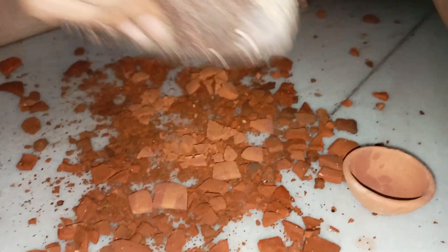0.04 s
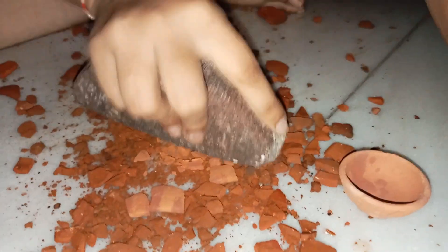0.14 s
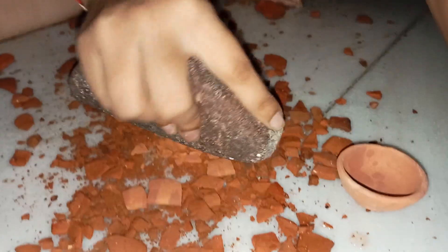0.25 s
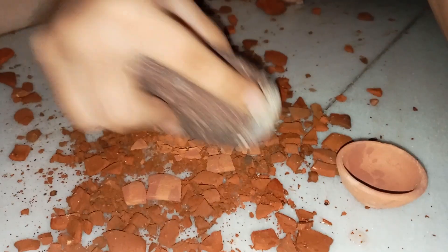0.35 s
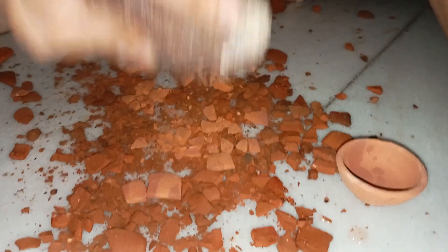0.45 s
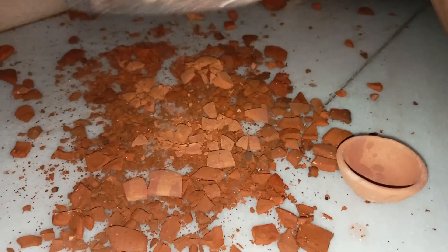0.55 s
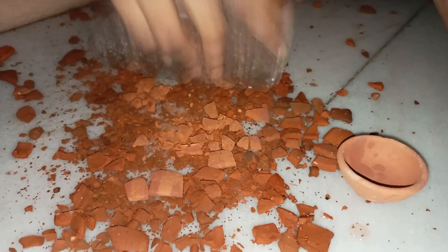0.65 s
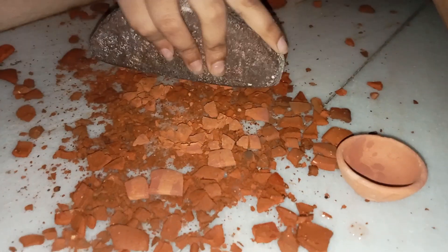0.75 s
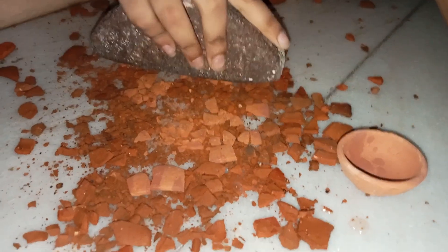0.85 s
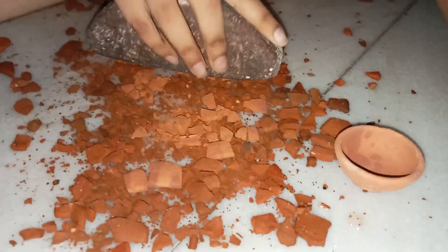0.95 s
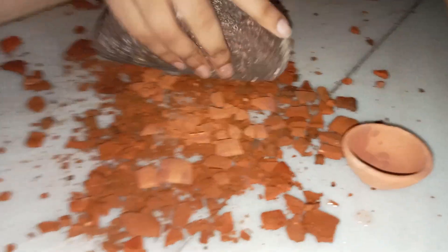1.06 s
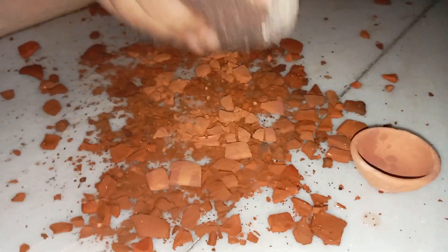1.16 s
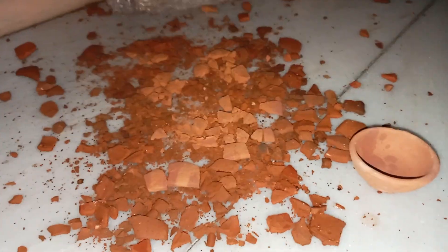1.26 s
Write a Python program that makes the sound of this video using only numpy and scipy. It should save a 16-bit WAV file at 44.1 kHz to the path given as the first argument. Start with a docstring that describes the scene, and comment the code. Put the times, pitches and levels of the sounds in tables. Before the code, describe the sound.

A rough stone strikes clay shards on a tiled floor twice, crunching hard in an echoing room

```python
"""A bare, echoing room with a tiled floor, where a rough stone comes down twice on clay shards. Each blow is a
crunch of random snaps ringing stone and shard modes, a thud of slab and tile, and dull knocks. Band-filtered
noise makes the tails, one left from an earlier blow, as well as the steady room hiss. Singing shards, an uneven
low pulsing and grit ticks fill the gaps; soft low knocks and a faint rustle come last. The small microphone
thins the deep bass and overloads on peaks."""
import sys
import numpy as np
from scipy import signal
from scipy.io import wavfile

SR = 44100
rng = np.random.default_rng(int(sys.argv[2]) if len(sys.argv) > 2 else 0)


def natural_amplitude(level_db):
    """Convert a level in decibels to a linear amplitude factor, elementwise."""
    exponent = np.asarray(level_db, float) / 20
    return 10 ** exponent


def output_pcm(signal):
    """Save a mono or channel-first signal as 16-bit PCM at the path in sys.argv[1].

    Samples are clipped to [-1, 1] before scaling.
    """
    pcm = np.clip(np.atleast_2d(signal).T, -1, 1) * 32767
    wavfile.write(sys.argv[1], SR, np.round(pcm).astype(np.int16))


N = 59535
LEAD = SR // 2  # samples of run-up, trimmed off at the end
TOTAL = N + LEAD

# Steady room hiss, relative spectrum: [pitch_hz, density_db]
HISS_SPECTRUM = [(30, -20), (55, -4), (110, 3.5), (200, 3), (450, -6.5), (1000, -9), (2000, -10.5),
                 (3500, -14.5), (4500, -22), (5600, -74), (7500, -56.5), (9500, -35.5), (11500, -58),
                 (16000, -47)]
HISS_DB, HISS_WAVER_DB, HISS_KNOT_SAMPLES = -47, 0.7, 2000

# Reverberant tails, the first from an earlier blow: [start_s, level_db, early_decay_share of the late decay]
ROOM_TAILS = [(-0.27, 3.5, 0.34), (0.236, 1.5, 0.55), (0.773, 3.5, 0.77)]
# Colour of each tail, one list per tail: [pitch_hz, density_db]
TAIL_SPECTRA = [
    [(50, -29), (108, 5.5), (170, -24.5), (430, -2.5), (800, -12), (1200, -27), (2600, -22.5), (4500, -48),
     (6500, -60), (16000, -78)],
    [(50, -31), (110, -15.5), (160, 3), (240, -2.5), (640, -2.5), (880, -9), (1150, -18), (1900, -29),
     (2650, -19.5), (3900, -30.5), (5300, -54), (7000, -70), (9700, -39.5), (10600, -48), (12300, -46),
     (14000, -49), (16000, -58)],
    [(50, -16), (105, -26), (160, -15), (250, -25), (390, -5.5), (600, -24), (780, -18), (1240, -23),
     (2600, -28.5), (4000, -29), (5300, -38), (6500, -59), (7400, -47), (8400, -43), (10200, -28.5),
     (11800, -44), (13000, -57), (16000, -46)],
]
# Late decay of the room: [pitch_hz, t60_s]
ROOM_DECAY = [(60, 0.24), (150, 0.51), (500, 0.45), (1500, 0.43), (4000, 0.4), (10000, 0.16), (15000, 0.17)]
ROOM_RISE_S, EARLY_DECAY_S = 0.0013, 0.23
TAIL_FLICKER_DB, TAIL_FLICKER_KNOTS, TAIL_FLICKER_FROM_HZ = 2.0, 400, 1500  # knots per tail

# Grit ticking: [start_s, level_db]
GRIT_TICKS = [(0.0735, -57), (0.0945, -70), (0.103, -62), (0.1200, -53), (0.4150, -59), (0.438, -66),
              (1.0866, -60)]
TICK_DECAY_S, TICK_LOW_HZ = 0.0005, 4000

# Clay cracking under the stone, one list per blow: [start_s, level_db, length_s]
CLAY_CRACKS = [
    [(0.2311, -2.5, 0.0011), (0.2345, -23, 0.0039)],
    [(0.7690, -6.5, 0.0023), (0.7712, -14.5, 0.0027)],
]
# Stone and shard modes: [pitch_hz, first_blow_db, second_blow_db]
STONE_MODES = [(1374, -6.5, 4), (2440, 4, -10.5), (3940, 4.5, 3.5), (4750, -11, -10.5), (5520, -12.5, -9),
               (7080, -46, -17.5), (9200, -6, -19), (9800, -27, -14.5), (10020, -3.5, -13),
               (10200, -16, -4), (11840, -27, -9), (15000, -18, -16)]
STONE_T60_S, CRACK_RISE_S = 0.0055, 0.00022
CRACKS_PER_S, CRACK_SPREAD_DB = 12000, 2.2

# The two blows: [start_s, boom_db, tile_ring_db, contact_sharpness_hz]
STONE_BLOWS = [(0.2320, 1.5, 0.5, 1470), (0.7703, 4, -6.5, 995)]
# Floor slab modes: [pitch_hz, level_db, t60_s]
SLAB_MODES = [(108.7, -33, 0.93), (134.6, -13.5, 0.15), (157.4, -4, 0.089)]
# Tile modes, the blows landing on different spots: [pitch_hz, first_blow_db, second_blow_db, t60_s]
TILE_MODES = [(299, -11, -14.5, 0.043), (416, -30, -2.5, 0.04), (528, 5.5, -1.5, 0.052),
              (675.5, -2, -13.5, 0.087), (769, -4.5, -10, 0.057), (857, 1.5, -16, 0.038)]
TILE_LAG_S, DULL_CONTACT_HZ = 0.0011, 314

# Short dull knocks just after each blow: [start_s, level_db, length_s]
DULL_KNOCK_BURSTS = [(0.2367, -3, 0.0007), (0.2465, -1.5, 0.0022), (0.2505, -16.5, 0.0045),
                     (0.7838, -10.5, .002)]
# What the dull knocks ring with: [pitch_hz, level_db, t60_s]
DULL_KNOCK_MODES = [(2600, 0, 0.011), (4640, -22, 0.005), (2100, -14, .004)]
DULL_KNOCK_CUT_HZ = 4000

# Loose shards singing on in narrow bands: [start_s, pitch_hz, level_db, t60_s]
SINGING_SHARDS = [(0.24, 2680, -34, 0.16), (0.24, 9540, -47.5, 0.37), (0.24, 14100, -62.5, 0.37),
                  (0.775, 4080, -48.5, 0.98), (0.776, 7600, -75, 1), (0.776, 9400, -63, 1),
                  (0.776, 10300, -66, 1), (0.776, 11800, -55, 0.62), (0.776, 15300, -60, 0.39)]
SHARD_BAND_T60_S = 0.007  # shorter means a wider band

# Uneven low swells as the boom pulses on after each blow: [lag_s after the blow, level_db, pitch_hz]
LOW_SWELLS = [(0.021, -19.5, 158), (.047, -22, 167), (.066, -18.5, 158), (.076, -28, 105),
              (.120, -18.5, 163), (.160, -20.5, 163), (.183, -29.5, 105), (.197, -24, 150),
              (0.259, -34, 104), (0.287, -32.5, 106)]
# How fast the swells weaken, one value per blow: [fade_db_per_s]
SWELL_FADES = [10.5, 73.5]
SWELL_T60_S = 0.057

# Soft low knocks: [start_s, level_db, pitch_hz]
LOW_KNOCKS = [(1.127, -27, 79), (1.176, -26.5, 152)]
LOW_KNOCK_T60_S = 0.06

# Level path of the faint bright rustle: [time_s, level_db]
RUSTLE_PATH = [(1.14, -96), (1.18, -78.5), (1.22, -73.5), (1.262, -107)]
RUSTLE_LOW_HZ, RUSTLE_HIGH_HZ = 8500, 12100

MIC_LOW_HZ, CLIP_KNEE, TREBLE_STOP_HZ = 76.6, 5.0, 16300  # a higher knee clips harder


def at_hz(points, hz):
    """Reads a table along a log-frequency axis."""
    table = np.array(points)
    return np.interp(np.log(hz), np.log(table[:, 0]), table[:, 1])


def rms_one(x):
    """Scales a sound to unit rms."""
    return x / np.sqrt(np.mean(x ** 2) + 1e-20)


def timeline():
    """Seconds from the audible start, negative in the run-up."""
    return (np.arange(TOTAL) - LEAD) / SR


def filtered(x, order, hz, kind):
    """Passes a sound through a Butterworth filter."""
    return signal.sosfilt(signal.butter(order, hz, kind, fs=SR, output="sos"), x)


def clicks(start_s, level_db):
    """Places single-sample impulses, the bare contacts that excite resonances."""
    out = np.full(TOTAL, 1e-18)
    where = (np.asarray(start_s) * SR).astype(int) + LEAD
    np.add.at(out, where, natural_amplitude(level_db))
    return out


def ring(x, hz, t60):
    """A two-pole resonance: a unit click sets off a decaying sine of starting height 1."""
    r, w = natural_amplitude(-60 / (t60 * SR)), 2 * np.pi * hz / SR
    return signal.lfilter([0, np.sin(w)], [1, -2 * r * np.cos(w), r * r], x)


def body(x, modes, soft_hz):
    """A contact softened by a double low-pass strikes all modes of a body."""
    r = np.exp(-2 * np.pi * soft_hz / SR)
    push = signal.lfilter([(1 - r) ** 2], [1, -2 * r, r * r], x)
    return sum(natural_amplitude(db) * ring(push, hz, t60) for hz, db, t60 in modes)


def crackle(bursts, modes):
    """Brief bursts of uneven random snaps, each mode struck by its own draw of them."""
    t, shape = timeline(), np.zeros(TOTAL)
    for start, db, length in bursts:
        age = np.maximum(t - start, 0)
        rise = 1 - np.exp(-age / CRACK_RISE_S)
        shape += natural_amplitude(db) * rise * np.exp(-(age / length) ** 2)
    out = 0
    for hz, db, t60 in modes:
        snaps = (rng.random(TOTAL) < CRACKS_PER_S / SR) * rng.choice([-1, 1], TOTAL)
        sizes = natural_amplitude(CRACK_SPREAD_DB * np.minimum(rng.exponential(1, TOTAL), 3) - 14)
        out = out + natural_amplitude(db) * ring(snaps * sizes * shape + 1e-18, hz, t60)
    return out


def bands(size, shape):
    """Sixth-octave bands of noise, each multiplied by shape(centre_hz)."""
    edges = 28 * 2 ** (np.arange(57) / 6)
    white = rng.standard_normal((2, size))  # neighbouring bands use different noise
    out = 0
    for k, (low, high) in enumerate(zip(edges, edges[1:])):
        out = out + filtered(white[k % 2], 2, [low, high], "band") * shape(np.sqrt(low * high))
    return out


def hiss():
    """Steady coloured noise, each band wavering a little in level."""
    place = np.arange(TOTAL) / HISS_KNOT_SAMPLES

    def level(hz):
        knots = rng.standard_normal(TOTAL // HISS_KNOT_SAMPLES + 2)
        waver_db = HISS_WAVER_DB * np.interp(place, np.arange(len(knots)), knots)
        return natural_amplitude(at_hz(HISS_SPECTRUM, hz) + waver_db)
    return natural_amplitude(HISS_DB) * rms_one(bands(TOTAL, level))


def room():
    """Noise tails build, sink slowly, then die band by band; a random flicker in level roughens their treble."""
    out = np.zeros(TOTAL + SR)
    warm_up = SR // 5  # lets the filters settle
    t = np.arange(-warm_up, SR * 7 // 10) / SR
    for (start_s, db, early), colour in zip(ROOM_TAILS, TAIL_SPECTRA):
        age = early * np.clip(t, 0, EARLY_DECAY_S) + np.maximum(t - EARLY_DECAY_S, 0)
        knots = np.minimum(rng.exponential(1, TAIL_FLICKER_KNOTS), 2) - 1
        flicker_db = TAIL_FLICKER_DB * np.interp(t, np.linspace(t[0], t[-1], len(knots)), knots)

        def level(hz):
            decay_db = 60 * age / at_hz(ROOM_DECAY, hz)
            return natural_amplitude(at_hz(colour, hz) + flicker_db * (hz > TAIL_FLICKER_FROM_HZ) - decay_db)
        build_up = 1 - np.exp(-(np.maximum(t, 0) / ROOM_RISE_S) ** 2)
        tail = (bands(len(t), level) * build_up)[warm_up:]
        start = int(start_s * SR) + LEAD
        out[start:start + len(tail)] += natural_amplitude(db) * tail
    return out[:TOTAL]


def ticks():
    """Each grain of grit is a thin, fast-decaying puff of bright noise."""
    fall = np.exp(-1 / (TICK_DECAY_S * SR))
    envelope = signal.lfilter([1], [1, -fall], clicks(*np.transpose(GRIT_TICKS)))
    return filtered(envelope * rng.standard_normal(TOTAL), 2, TICK_LOW_HZ, "high")


def crunch():
    """Cracking clay sets short stone and shard modes ringing, balanced differently for each blow."""
    out = 0
    for k, cracks in enumerate(CLAY_CRACKS):
        modes = [(mode[0], mode[1 + k], STONE_T60_S) for mode in STONE_MODES]
        out = out + crackle(cracks, modes)
    return out


def slab():
    """The floor slab's low modes boom under each softened blow."""
    start_s, boom_db, _, _ = np.transpose(STONE_BLOWS)
    return body(clicks(start_s, boom_db), SLAB_MODES, DULL_CONTACT_HZ)


def tile():
    """The tile rings just after each blow, its mode balance set by the spot struck."""
    out = 0
    for k, (start, _, db, contact_hz) in enumerate(STONE_BLOWS):
        modes = np.array(TILE_MODES)[:, [0, 1 + k, 3]]
        out = out + body(clicks([start + TILE_LAG_S], [db]), modes, contact_hz)
    return out


def dull_knocks():
    """Low-passed bursts of snaps give short dull knocks just after each blow."""
    return filtered(crackle(DULL_KNOCK_BURSTS, DULL_KNOCK_MODES), 2, DULL_KNOCK_CUT_HZ, "low")


def shard_rings():
    """Loose shards sing on as dying noise through one narrow resonance each."""
    t, out = timeline(), 0
    for start, hz, db, t60 in SINGING_SHARDS:
        age = np.maximum(t - start, 0)
        band = rms_one(ring(rng.standard_normal(TOTAL), hz, SHARD_BAND_T60_S))
        out = out + band * natural_amplitude(db - 60 * age / t60) * (1 - np.exp(-age / ROOM_RISE_S))
    return out


def low_pulsing():
    """The boom pulses on in low swells, each rising and sinking through one resonance passed twice, later ones
    losing more."""
    out = 0
    for (start, boom_db, _, _), fade_db in zip(STONE_BLOWS, SWELL_FADES):
        for lag, db, hz in LOW_SWELLS:
            hit = clicks([start + lag], [boom_db + db - fade_db * lag])
            out = out + ring(ring(hit, hz, SWELL_T60_S), hz, SWELL_T60_S)
    # A unit click through both passes would swell to about height 1.
    return out * 2 * np.e * np.log(1000) / (SWELL_T60_S * SR)


def low_knocks():
    """Soft contacts each ring one low mode."""
    return sum(body(clicks([start], [db]), [(hz, 0, LOW_KNOCK_T60_S)], DULL_CONTACT_HZ)
               for start, db, hz in LOW_KNOCKS)


def rustle():
    """Uneven noise in a bright band follows a drawn level path."""
    time_s, level_db = np.transpose(RUSTLE_PATH)
    grains = rng.standard_normal(TOTAL) * rng.exponential(1, TOTAL)
    bright = filtered(grains, 2, [RUSTLE_LOW_HZ, RUSTLE_HIGH_HZ], "band")
    return natural_amplitude(np.interp(timeline(), time_s, level_db)) * rms_one(bright)


def scene():
    """Layers the room, the blows and the quiet sounds, then trims the run-up."""
    background = hiss() + room()
    blows = crunch() + slab() + tile() + dull_knocks()
    after_sounds = shard_rings() + low_pulsing()
    small_sounds = ticks() + low_knocks() + rustle()
    return (background + blows + after_sounds + small_sounds)[None, LEAD:]


def band_limit(x):
    """A steep low-pass at the top of the band."""
    return signal.sosfilt(signal.butter(12, 16340, fs=SR, output="sos"), x)


def record(dry):
    """The start eases in; the small microphone loses deep bass, rounds off peaks and has its top cut."""
    eased = dry * np.minimum(np.arange(N) / 64, 1)
    thin = filtered(eased, 4, MIC_LOW_HZ, "high")
    overloaded = thin / (1 + np.abs(thin) ** CLIP_KNEE) ** (1 / CLIP_KNEE)
    top_cut = signal.cheby2(12, 60, TREBLE_STOP_HZ, fs=SR, output="sos")
    mix = np.clip(signal.sosfilt(top_cut, overloaded), -1, 1)
    return band_limit(mix)


dry = scene()
out = record(dry)
output_pcm(out)
```